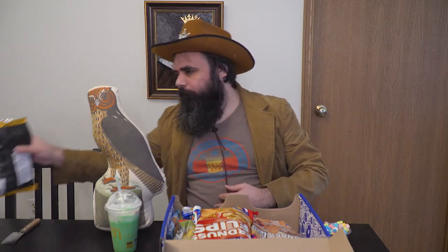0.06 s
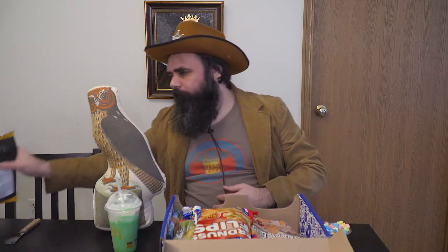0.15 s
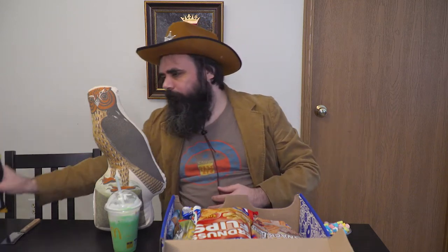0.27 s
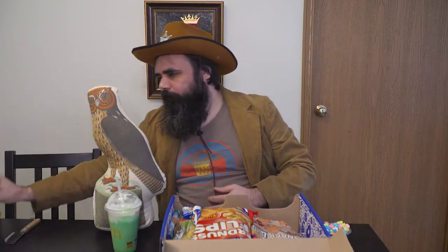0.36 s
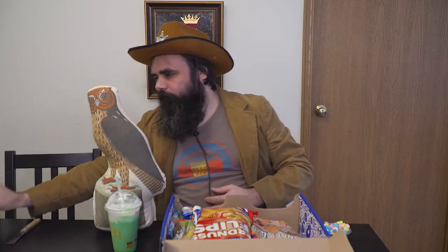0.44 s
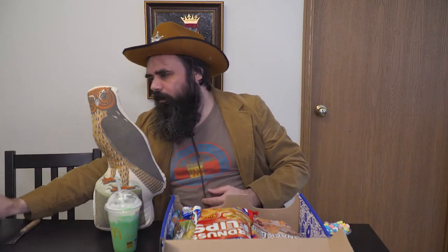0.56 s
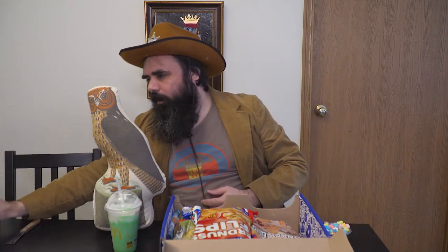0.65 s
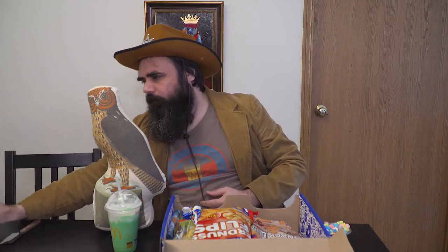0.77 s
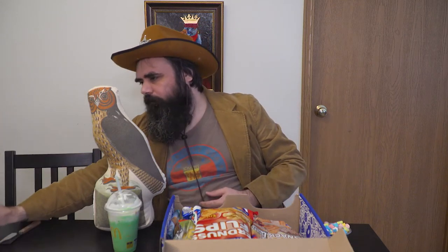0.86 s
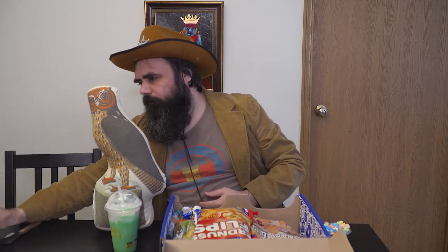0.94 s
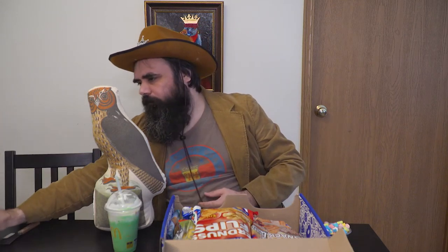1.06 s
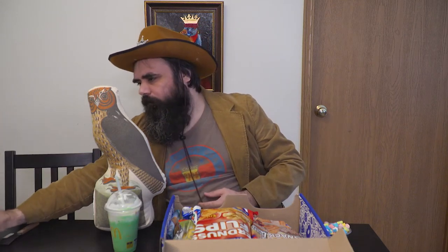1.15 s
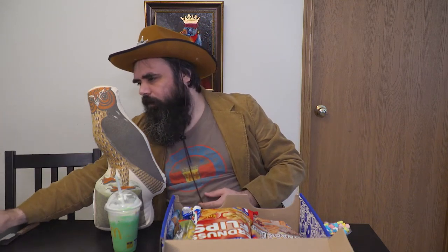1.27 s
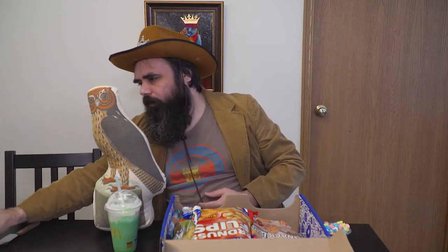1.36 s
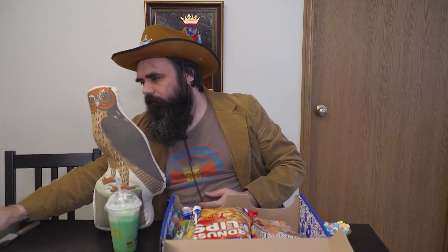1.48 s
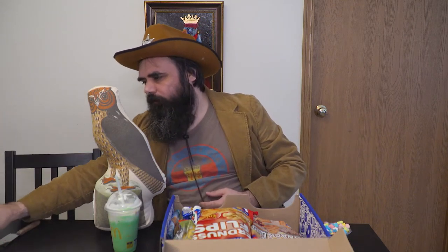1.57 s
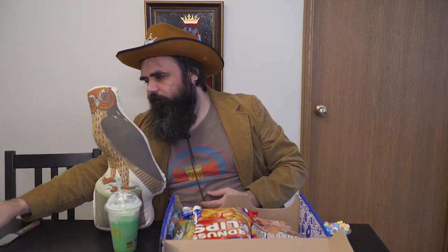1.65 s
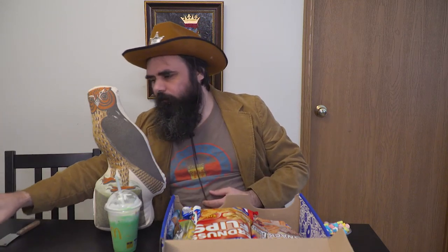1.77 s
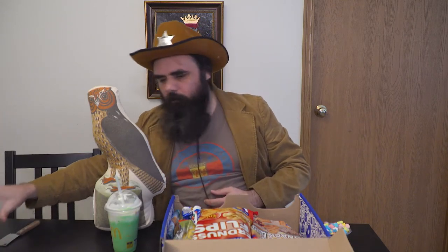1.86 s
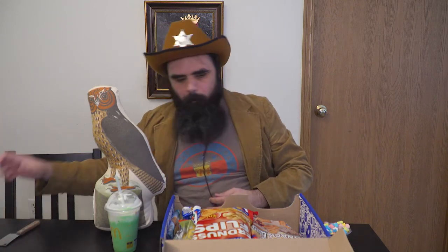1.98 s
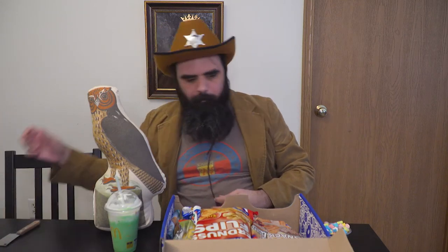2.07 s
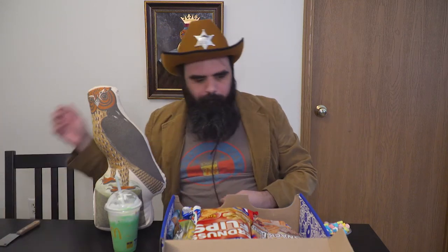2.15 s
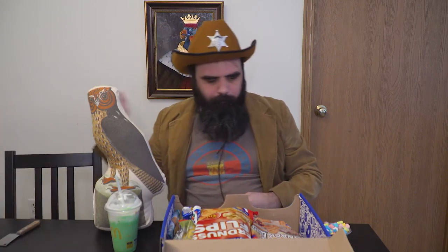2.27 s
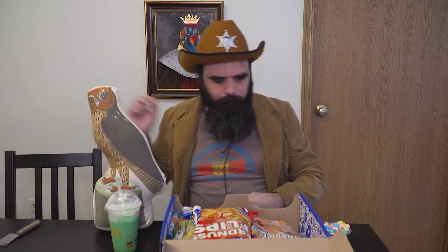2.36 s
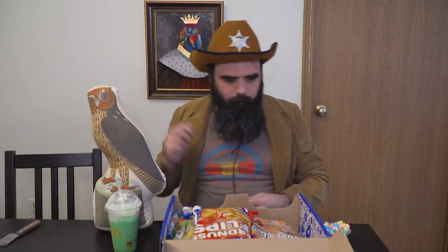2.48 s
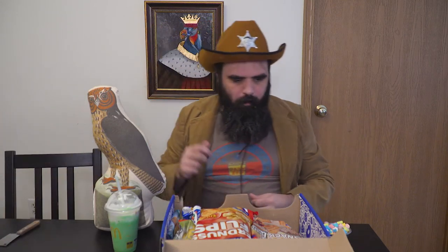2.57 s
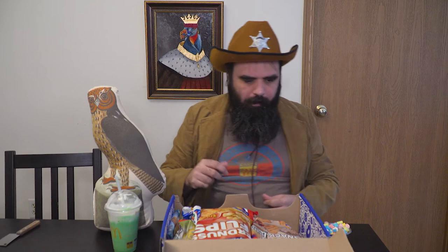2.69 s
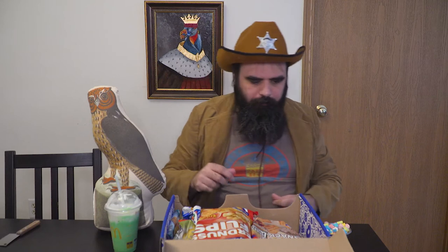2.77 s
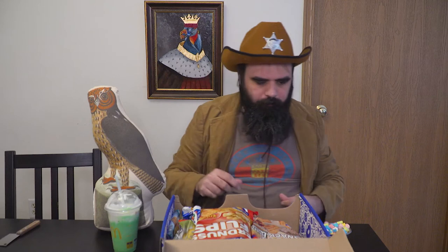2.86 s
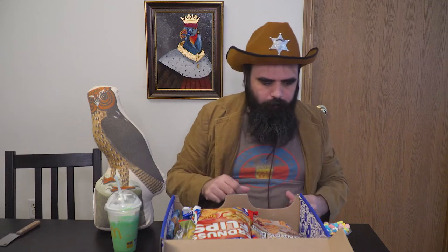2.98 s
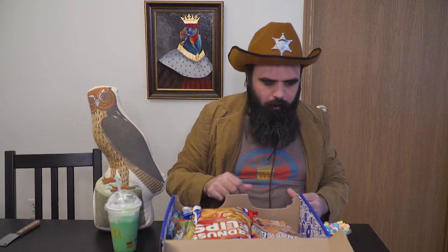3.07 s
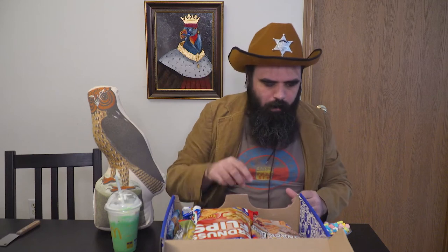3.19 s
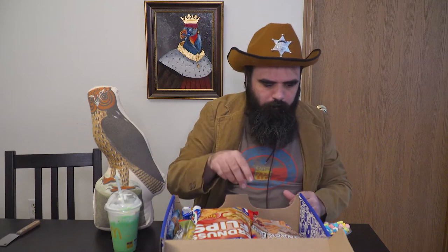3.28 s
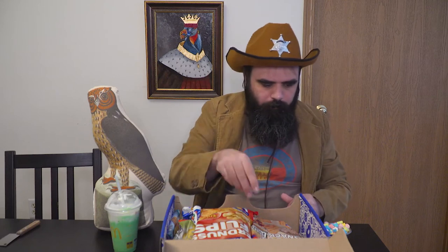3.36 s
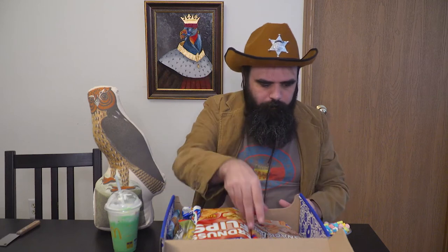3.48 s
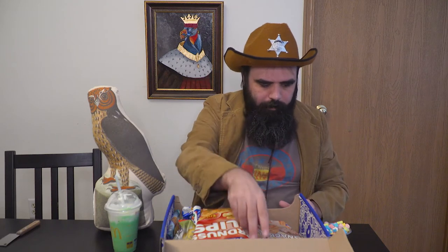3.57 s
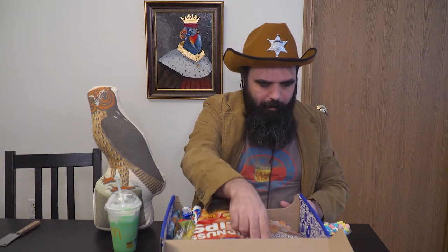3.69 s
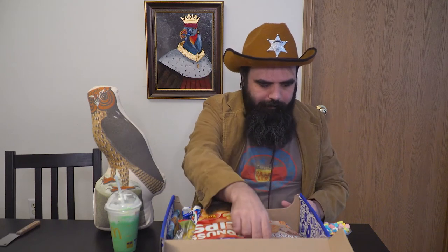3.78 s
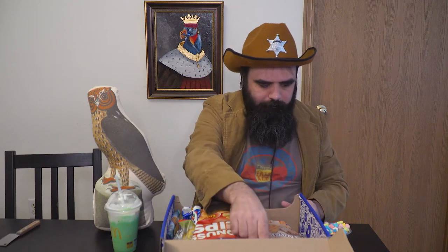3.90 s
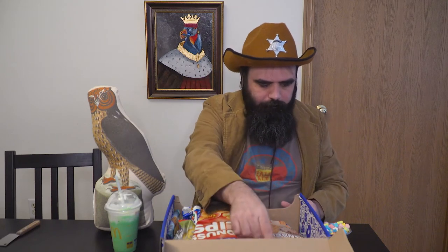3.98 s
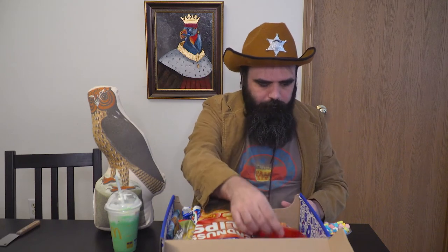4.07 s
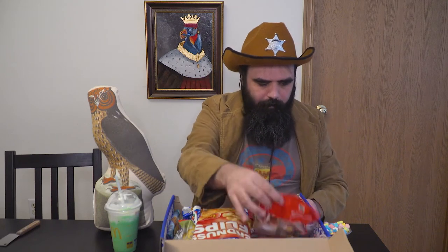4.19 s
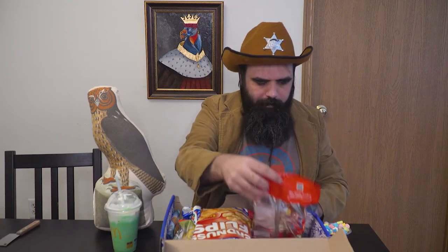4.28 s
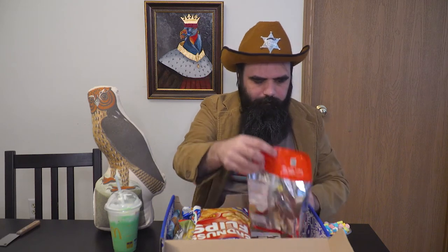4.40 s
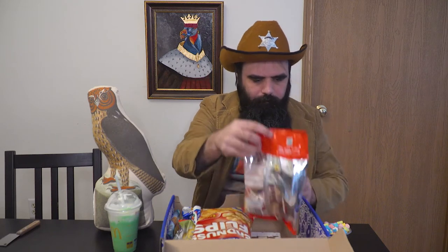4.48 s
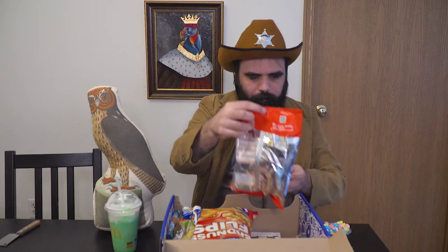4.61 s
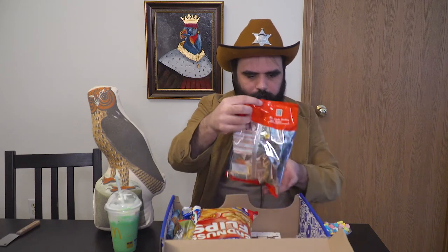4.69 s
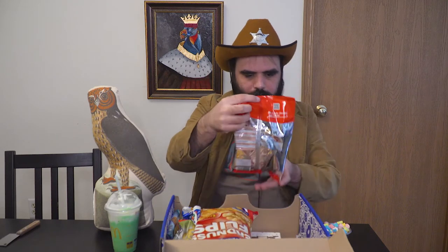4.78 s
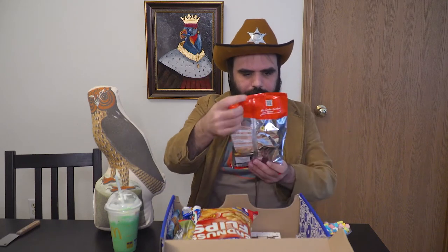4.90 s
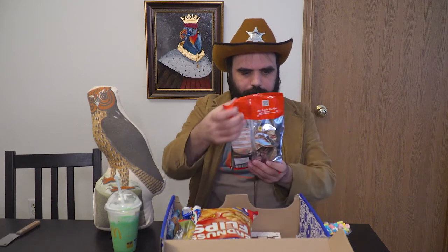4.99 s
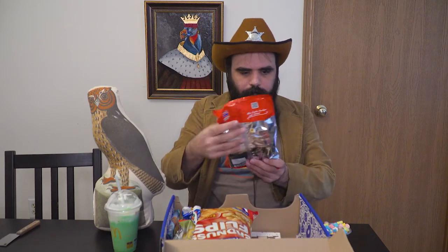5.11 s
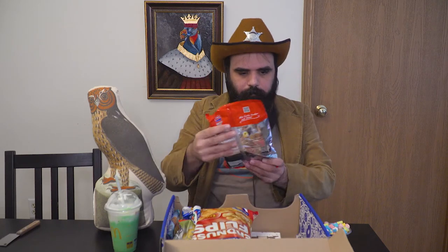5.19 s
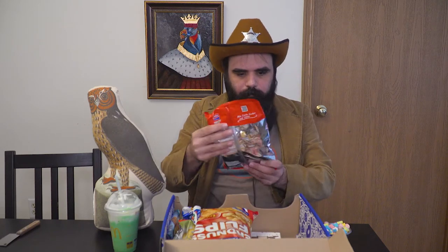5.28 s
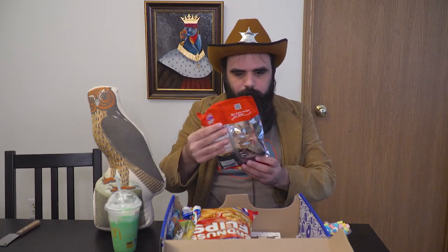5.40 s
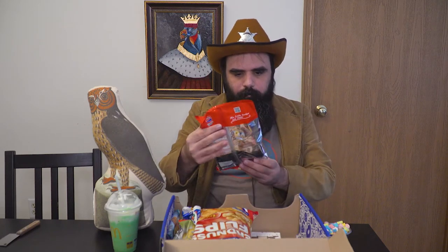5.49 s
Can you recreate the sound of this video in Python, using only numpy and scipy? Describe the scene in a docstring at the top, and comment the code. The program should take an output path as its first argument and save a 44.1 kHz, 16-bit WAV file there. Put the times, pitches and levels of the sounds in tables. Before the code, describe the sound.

Crisp plastic crackling fades to quiet with small clicks and soft bumps, then louder bag rustling against cardboard in a small room.

```python
"""Plastic snack bags at a table

Thin bags are handled in a small room: one is laid aside, another is pulled out of a cardboard box.
Creases snap as short noise bursts over a dense crackle of tiny ringing clicks; the contents rustle low.
Between the bags there are mostly stray ticks, soft bumps and scuffs, made of short tones and noise bands.
The room adds echoes and a short noise tail; a mains hum (a sine) and faint hiss lie below."""
import sys
import numpy as np
from scipy import signal
from scipy.fft import rfft, irfft
from scipy.io import wavfile

SR = 44100
rng = np.random.default_rng(int(sys.argv[2]) if len(sys.argv) > 2 else 0)


def int16_out(signal):
    """Quantize to a 16-bit WAV file."""
    q = np.round(np.clip(np.atleast_2d(signal).T, -1, 1) * 32767)
    wavfile.write(sys.argv[1], SR, q.astype(np.int16))


N = 244652

# Source levels are those before the microphone port; hiss and hum bypass it.

# Steady hiss, its colour: f/Hz, relative level per Hz/dB
HISS_COLOUR = [(41, -47), (70, 0.5), (155, -7.5), (228, -4), (506, -15), (679, -11), (3410, -17.5),
               (7730, -23.5), (9060, -31), (13300, -29.5), (16000, -32)]
HISS_DB = -68
HUM_HZ, HUM_DB = 50.2, -68

# Effort of the hand on the bag: t/s, level/dB
HAND_EFFORT = [(0.0, -40.5), (0.14, -52.5), (0.3, -51), (0.36, -45.5), (0.58, -49), (0.72, -51.5),
               (0.8, -45.5), (0.89, -54.5), (0.985, -58), (1.04, -62), (1.14, -53), (1.29, -45.5),
               (1.42, -55), (1.56, -60), (1.66, -60.5), (1.83, -72.5), (2.2, -71), (2.45, -79), (2.65, -70),
               (2.94, -77), (3.2, -68), (3.6, -74.5), (3.63, -59), (3.81, -45), (3.9, -51), (4.02, -43.5),
               (4.26, -44.5), (4.35, -35), (4.45, -51), (4.58, -55), (4.66, -63.5), (4.83, -54.5),
               (4.85, -40), (4.93, -39.5), (5.0, -39.5), (5.13, -42.5), (5.17, -34.5), (5.27, -37),
               (5.38, -45.5), (5.46, -35.5), (5.55, -45.5)]
FLURRY_T60_S = 0.18   # time for the crackle after a loud snap to fall by 60 dB

# How the bag in hand sounds: t/s, crackle tilt/dB per octave, contents level against the handling/dB
BAG_CHARACTER = [(0, -3.5, -4), (.45, -1, -3), (1.0, -3.5, -4.5), (1.6, -3, 1.5), (1.9, -2.5, -9),
                 (2.3, -1.5, 11), (2.5, 1, -15), (2.85, -2.5, 11.5), (3.5, 0.5, -2.5), (3.7, -5, -0.5),
                 (4.05, -1.5, -2), (4.3, 1, -10), (4.7, 0, -6.5), (5.1, -2, -10), (5.55, -1.5, -10.5)]
BRIGHT_PER_DB = 0.06   # the crackle brightens as it swells: dB per octave for each dB of handling

# Colour of the crackling film: f/Hz, relative level per Hz/dB
FILM_COLOUR = [(240, -29), (400, -26), (481, -23.5), (935, 9.5), (5520, -2.5), (7630, -5.5), (8900, -25),
               (12100, -19), (16000, 11.5)]
CREASES_PER_S, CREASE_SPREAD_DB = 1300.0, 4.6   # tiny creases: rate before clumping, spread of sizes
CRACKLE_SHARE, RUSTLE_SHARE = 0.46, 0.52   # amplitude factors on the handling level

# Resonances of the cardboard box: f/Hz, width/Hz, relative level/dB
BOX_RESONANCES = [(252, 36, -8), (384, 48, 2), (603, 21, 0), (1014, 220, -3.5)]
# Bag against the box: t/s, box level against the soft rustle/dB
BOX_CONTACT_LEVEL = [(0, -23), (3.5, -1), (3.62, 5), (4.3, 2.5), (4.6, -3.5), (5.55, 4)]

# Decay of the room tail: f/Hz, time to fall by 60 dB/s
ROOM_DECAY = [(200, 0.46), (530, 0.37), (1400, 0.36), (3700, 0.29), (9700, 0.064)]
ROOM_DB, EARLY_DB, EARLY_T60_S, WALL_CUT_HZ = -11, -10.5, 0.071, 7100
ECHO_SPARSE = 2.6   # noise threshold: about one sample in a hundred carries an early echo

# The loudest creases that snap: t/s, peak level/dB, then three rms levels against that peak/dB:
# body (350-1200 Hz), treble (over 7000 Hz) and the flurry that follows
LOUD_SNAPS = [(0.01, -23.5, -29, -45, -32), (0.034, -22, -30, -21, -31), (0.051, -22, -30, -23, -25),
              (0.079, -18.5, -21.5, -21, -20), (0.163, -14, -22.5, -18.5, -23),
              (0.261, -31, -9.5, -22, -25), (0.313, -36, -17, -14, -20), (0.341, -28, -17, -22, -25),
              (0.352, -25.5, -24, -22, -15), (0.378, -27.5, -27, -15, -31), (0.412, -29, -28, -11, -19),
              (0.432, -29, -33, -6, -24), (0.471, -23.5, -21, -18, -19), (0.49, -28, -13, -19, -20),
              (0.495, -28.5, -10, -28, -22), (0.506, -30.5, -3.5, -23, -23), (0.533, -27.5, -9.5, -10, -19),
              (0.537, -21, -22, -21, -24), (0.568, -22.5, -13.5, -27, -14), (0.574, -32, -12, -21, -22),
              (0.602, -22.5, -27, -21, -19.5), (0.614, -29, -19, -21, -24), (0.657, -35.5, -4, -28, -24),
              (0.668, -20.5, -19.5, -18, -20), (0.741, -23, -23, -9.5, -25), (0.805, -34, -5.5, -19, -27),
              (0.827, -31, -17, -20, -16), (0.895, -21, -18.5, -17.5, -19.5), (0.963, -23.5, -18, -17, -15),
              (0.982, -25, -18, -19, -13.5), (1.049, -27, -17.5, -11, -18), (1.068, -20.5, -27, -13, -23.5),
              (1.072, -25.5, -14, -34, -26), (1.121, -27.5, -31, -11, -33), (1.13, -31, -26, -19, -27),
              (1.16, -19, -21, -5, -19), (1.185, -28, -15, -29, -19), (1.189, -31, -15, -20, -24),
              (1.213, -35, -18, -20, -25), (1.225, -25, -18.5, -7.5, -22), (1.233, -28.5, -31, -14, -22),
              (1.241, -29, -17, -12, -25), (1.257, -30, -25, -12, -22), (1.278, -20, -21, -20, -23),
              (1.285, -26, -19, -28, -29), (1.339, -37, -7, -19, -20), (1.357, -22, -18.5, -11, -17.5),
              (1.43, -38, -12, -19, -13), (1.459, -37.5, -8.5, -25, -22), (1.54, -39.5, -9, -16, -15),
              (1.582, -32, -16, -20, -16), (1.591, -32, -21, -34, -13.5), (1.672, -20.5, -14.5, -19, -21),
              (3.608, -44, -15, -18, -22), (3.617, -28.5, -19, -7, -22.5), (3.624, -25.5, -32, -18.5, -35),
              (3.656, -29, -23, -1, -21), (3.665, -20.5, -23, -16, -32), (3.678, -29.5, -19, 0.5, -21),
              (3.731, -18, -17.5, -11, -32), (3.772, -18.5, -19.5, -11.5, -32), (3.794, -30, -10, -28, -24),
              (3.804, -19, -25, -17, -19), (3.813, -28, -12, -11, -16), (3.853, -23, -14, -18, -18),
              (3.871, -22.5, -12.5, -25, -21.5), (3.905, -17, -25, -21, -40), (3.91, -16.5, -16, -13, -21),
              (3.921, -19, -18, -24, -16), (3.969, -34.5, -11, -11, -16), (4.006, -25, -10, -13, -23),
              (4.025, -12, -17.5, -9.5, -23), (4.03, -20, -14, -20, -22), (4.038, -22, -12, -22, -20),
              (4.065, -20.5, -21, -19, -23), (4.121, -28, -11.5, -15, -12.5), (4.172, -16, -27, -5, -20.5),
              (4.181, -22, -20, -18, -22), (4.186, -21, -26, -12, -22), (4.222, -22.5, -26, -16, -18.5),
              (4.258, -30, -25, -19, -21), (4.28, -26.5, -19, -28, -31), (4.303, -17, -26, -21, -35),
              (4.313, -25, -25.5, -26, -11), (4.333, -16.5, -26, -33, -21.5), (4.351, -22.5, -13, -11, -24),
              (4.361, -11.5, -37.5, -29, -30), (4.386, -20.5, -26, -12, -16), (4.435, -22, -24, -12, -24),
              (4.47, -15.5, -22.5, -14, -20.5), (4.482, -37, -16, 5, -22),
              (4.494, -14.5, -26.5, -2.5, -17.5), (4.552, -16, -21.5, -17.5, -20.5),
              (4.567, -22.5, -24.5, -9, -15.5), (4.587, -19.5, -30, -23, -28), (4.676, -39, -26, -18, -18),
              (4.688, -28.5, -23.5, -20, -18), (4.721, -29, -22.5, -8, -19), (4.752, -25, -25, -35.5, -21),
              (4.837, -28, -24, -4, -25), (4.847, -25.5, -24, -4, -20), (4.861, -16.5, -15, -26, -25),
              (4.909, -18, -23.5, -22, -16), (4.917, -15, -19.5, -5, -13), (4.929, -19, -18.5, -22, -16),
              (4.989, -23, -20, -10, -22), (5.013, -26, -20, -7, -20), (5.052, -28, -15, -31, -17),
              (5.113, -26.5, -24, -29, -25), (5.131, -28, -18, -7, -16), (5.145, -21, -22, -4.5, -15),
              (5.155, -23, -21, -30, -18), (5.165, -20, -18, -24, -15), (5.183, -20, -9, -2, -22),
              (5.193, -12, -18, -8, -24), (5.196, -14.5, -26, -20, -24), (5.201, -19, -22, -18, -24),
              (5.205, -12.5, -22, -7, -19), (5.21, -25, -21, -17, -25), (5.221, -16.5, -19, -18, -22),
              (5.231, -17.5, -29, -24, -20), (5.248, -17.5, -10.5, -6.5, -17), (5.258, -15, -21, -7, -24),
              (5.264, -12.5, -28, -33, -21), (5.269, -22, -12, -19, -29), (5.277, -24, -15, -15, -31),
              (5.29, -31, -30, -20, -26), (5.308, -30, -29, -11, -31), (5.328, -24.5, -42, -25, -31),
              (5.359, -31, -22, -13, -20), (5.41, -22.5, -31, -20.5, -16), (5.442, -20, -15, -19, -35),
              (5.454, -24.5, -10, -16, -20), (5.46, -27, -15, -15, -20), (5.476, -26, -15, -10, -28),
              (5.494, -30, -21, -17, -20), (5.511, -27, -15.5, -10, -20), (5.524, -20, -21, -20, -17)]
# Edges of the four snap bands: f/Hz
SNAP_BAND_EDGES = [350, 1200, 3000, 7000, 15500]
# How long the film shivers in each band: time to fall by 60 dB/s
SNAP_DECAY = [0.021, 0.014, 0.0039, 0.00078]
SETTLE_DB, SETTLE_T60_S = -9.958, 0.034   # small creases after a snap, before scaling to its peak
CREST_DB = 8.5   # peak over rms in the lowest and highest band
MIDDLE_DB, LEAN = -4.5, 0.33   # two middle bands: level against the peak, tilt by body minus treble
SMALL_PER_S, SMALL_SCATTER_DB = 45.0, 4.5   # lesser snaps: rate before thinning, chance spread
# Lesser snaps, one value for each band: peak level over the handling/dB
SMALL_SNAP_LEVELS = [2.6, 9.3, 11.4, 5.2]
BUSY_DB = -62   # below this handling level the lesser snaps grow rare
SNAP_DELAY_S = .001   # short delay before each snap and tick

# Soft bumps: t/s, level/dB, f/Hz
SOFT_BUMPS = [(0.02, -41, 1194), (0.083, -35.5, 270), (0.161, -39, 990), (0.3, -36, 347),
              (0.337, -42, 1100), (0.466, -32.5, 418), (0.508, -42, 437), (0.793, -37.5, 252),
              (2.012, -51.5, 340), (2.086, -52, 390), (2.136, -43, 236), (2.214, -46, 236),
              (2.249, -50.5, 680), (3.38, -65, 900), (3.92, -30, 400), (4.033, -29.5, 435),
              (5.442, -23.5, 936)]

# Bag dragged over an edge: t/s, level/dB, f/Hz
EDGE_SLIDE = [(0.245, -48, 1399), (0.265, -50, 897), (0.295, -47.5, 371), (0.335, -57, 308),
              (0.37, -68, 298)]
SLIDE_ROUGH_HZ = 130   # speed of the random roughness

# Ticks and knocks of furniture, box and resting bag: t/s, knock peak level/dB, f/Hz,
# bright crack peak and tail rms levels against the knock/dB
PITCHED_TICKS = [(1.832, -53, 4600, -20, -30), (1.851, -54, 3400, -2, -32), (1.889, -37, 3570, -2.5, -16),
                 (1.891, -43, 780, -32, -6), (1.894, -36.5, 2180, -10, -18), (1.899, -41, 3500, -8, -20),
                 (1.904, -43, 3600, -14, -20), (1.955, -51, 2500, -10, -18), (2.195, -66, 5500, -10, -30),
                 (2.289, -39.5, 2340, 1, -16), (2.294, -46, 3000, -10, -20), (2.298, -40, 2200, 0, -20),
                 (2.57, -48, 5230, -12, -25), (2.58, -62, 4000, -7, -22), (2.595, -56, 3000, -4, -14),
                 (2.553, -61, 4200, -20, -27), (2.603, -36, 1830, -9, -18), (2.718, -53, 5600, -20, -27),
                 (2.922, -55, 3400, -20, -23), (2.995, -29.5, 1960, -14.5, -17.5),
                 (2.995, -35.5, 890, -30, -14), (3.004, -35, 1900, -12, -16), (3.086, -62, 9500, -8, -30),
                 (3.117, -49, 7500, -5, -30), (3.126, -50, 5700, -3, -31), (3.132, -38, 2270, -7, -21),
                 (3.175, -42, 2620, 1, -11), (3.18, -42.5, 2300, 3, -15), (3.185, -44, 5800, -3, -16),
                 (3.921, -14, 1300, -4, -24), (3.926, -17, 1800, -10, -20), (3.932, -21, 2100, -12, -20)]
TICK_SPAN = 1.35   # pitch band as a ratio up and down
TICK_T60_S, TICK_TAIL_T60_S = 0.0056, .2   # decay of the tick and of its tail
# Weaker repeats of each tick: delay/s, level/dB
TICK_REPEATS = [(.0022, -6), (.0047, -12), (.0088, -16)]

# Sleeve and hand brush over something: t/s, swell time/s, level at the top of the swell/dB, f/Hz
HAND_SCUFFS = [(2.014, 0.0066, -59, 595), (2.08, 0.005, -60, 650), (2.135, 0.0081, -63, 1200),
               (2.245, .012, -63, 890), (2.458, 0.0068, -64.5, 800), (2.506, .005, -60.5, 1090),
               (2.525, .012, -67.5, 1300), (2.633, 0.011, -50, 750), (2.822, 0.0091, -62, 637),
               (2.866, 0.01, -62, 650), (2.922, 0.008, -64, 695), (3.36, .03, -66.5, 1210)]
SCUFF_SPAN = 1.8   # band as a ratio up and down

# Microphone port: f/Hz, width/Hz, gain before the overall cut/dB
PORT_RESONANCES = [(1580, 840, 3), (3585, 860, 8), (5560, 780, 7.5), (7590, 545, 10.5), (8850, 750, -7),
                   (9660, 1500, 4.5), (11940, 620, 8)]
CUTOFF_HZ = 16700


def amp(db):
    """Turn decibels into an amplitude factor."""
    return 10 ** (np.asarray(db) / 20)


def rms_one(x):
    """Scale a sound to an rms level of 1."""
    return x / np.sqrt(np.mean(x ** 2) + 1e-20)


def in_time(rows):
    """Draw straight lines between table rows, giving each column one value a sample."""
    s, *columns = np.transpose(rows)
    return [np.interp(np.arange(N) / SR, s, c) for c in columns]


def at_hz(points, hz):
    """Read a table at any frequency, on a logarithmic frequency scale."""
    table = np.array(points)
    return np.interp(np.log(hz), np.log(table[:, 0]), table[:, 1])


def band(x, low, high):
    """Keep the sound between two frequencies."""
    return signal.sosfilt(signal.butter(2, [low, high], "band", fs=SR, output="sos"), x + 1e-18)


def resonance(x, hz, width):
    """Ring at one frequency, with gain 1 at the top."""
    r = np.exp(-np.pi * width / SR)
    top = np.array([1, 0, -1]) * (1 - r * r) / 2
    bottom = [1, -2 * r * np.cos(2 * np.pi * hz / SR), r * r]
    return signal.lfilter(top, bottom, x + 1e-18)


def drift(rate):
    """Wander slowly by chance, with rms 1; made at a tenth of the sample rate."""
    r = np.exp(-20 * np.pi * rate / SR)
    white = rng.standard_normal(N // 10 + 2002)
    slow = signal.lfilter([1], [1, -2 * r, r * r], white)[2000:]
    return np.interp(np.arange(N) / 10, np.arange(len(slow)), rms_one(slow))


def place(times, sounds):
    """Start each row of sounds at its time."""
    out = np.zeros(N + SR)
    for start, sound in zip(np.round(times * SR).astype(int), sounds):
        out[start:start + len(sound)] += sound
    return out[:N]


def grains(per_s, spread_db):
    """Random clicks, many small and few large, coming in clumps."""
    born = rng.random(N) < per_s * amp(4 * drift(30)) / SR
    size = np.minimum(rng.exponential(1, N), 3)
    return born * amp(spread_db * size) * rng.choice([-1, 1], N)


def background():
    """Steady coloured hiss, and a mains hum whose level wavers slightly."""
    hz = np.maximum(np.arange(N // 2 + 1) * SR / N, 1)
    spectrum = rfft(rng.standard_normal(N)) * amp(at_hz(HISS_COLOUR, hz))
    hiss = rms_one(irfft(spectrum, N))
    sine = np.sqrt(2) * np.sin(2 * np.pi * HUM_HZ * np.arange(N) / SR)
    hum = sine * amp(0.17 * drift(3.3))
    return amp(HISS_DB) * hiss + amp(HUM_DB) * hum


def handling():
    """Handling level in dB: power of the hand's effort plus a dying flurry after each loud snap."""
    rows, t = np.array(LOUD_SNAPS), np.arange(SR // 4) / SR
    flurry_db = rows[:, 1:2] + rows[:, 4:] - 60 * t / FLURRY_T60_S
    flurry = place(rows[:, 0], amp(flurry_db) ** 2)
    return 10 * np.log10(amp(in_time(HAND_EFFORT)[0]) ** 2 + flurry)


def crackle(level_db, bright_db):
    """Tiny creases of all sizes, each ringing a cycle or two around its own pitch."""
    clicks, pitches = grains(CREASES_PER_S, CREASE_SPREAD_DB), np.geomspace(450, 14500, 22)
    dealt, out = rng.integers(0, 22, N), 0
    for k, hz in enumerate(pitches):
        own = clicks * (np.abs(dealt - k) < 3)    # a crease also excites the neighbouring pitches
        ringing = rms_one(resonance(own, hz, .4 * hz))
        tilt = np.clip(bright_db, -5, 2) * np.log2(hz / 2500)
        # the bands widen with pitch, hence the square root
        out = out + amp(at_hz(FILM_COLOUR, hz)) * amp(tilt) * np.sqrt(hz) * ringing
    untilted_rms = np.sqrt(np.sum(amp(at_hz(FILM_COLOUR, pitches)) ** 2 * pitches))
    return CRACKLE_SHARE * amp(level_db) * out / untilted_rms


def rustle(level_db):
    """The contents and air cushion shift: soft low grains that ring in the box when the bag rubs it."""
    soft = rms_one(band(band(grains(500.0, 5.5), 147, 2600), 118, 890))
    box = rms_one(sum(amp(db) * resonance(soft, hz, width) for hz, width, db in BOX_RESONANCES))
    return RUSTLE_SHARE * amp(level_db) * (soft + amp(in_time(BOX_CONTACT_LEVEL)[0]) * box)


def room(x, count=64):
    """Early echoes from table and near walls, then a tail that dies band by band.

    Echoes and tail are drawn anew for each short stretch of time."""
    t, edges = np.arange(SR // 3) / SR, 100 * 2 ** np.arange(0, 7.6, .5)
    white = rng.standard_normal((3, count, len(t)))
    tail = 0
    for k, (low, high) in enumerate(zip(edges, edges[1:])):
        tail = tail + band(white[k % 2], low, high) * amp(-60 * t / at_hz(ROOM_DECAY, low))
    tail *= 1 - np.exp(-t / 0.0024)
    sparse = white[2] * (np.abs(white[2]) > ECHO_SPARSE)
    early = band(sparse, 200, WALL_CUT_HZ) * amp(-60 * t / EARLY_T60_S) * (1 - np.exp(-t / 0.00051))
    response = (amp(ROOM_DB) * rms_one(tail) + amp(EARLY_DB) * rms_one(early)) / np.sqrt(len(t))
    step = N // count + 1
    pieces = np.pad(x, (0, step * count - N)).reshape(count, step)
    return place(np.arange(count) * step / SR, signal.fftconvolve(pieces, response, axes=1))


def snap_levels():
    """Rows (t/s, four peak levels/dB): loud snaps by table, lesser ones by chance, following the effort."""
    s, peak, body, treble, _ = np.transpose(LOUD_SNAPS)
    lean = LEAN * (body - treble)
    loud = peak + np.array([body + CREST_DB, MIDDLE_DB + lean, MIDDLE_DB - lean, treble + CREST_DB])
    draw = np.minimum(rng.standard_normal((500, 4)), 1.5)
    when = np.cumsum(rng.exponential(1, 500)) / SMALL_PER_S
    effort_db = np.interp(when, *np.transpose(HAND_EFFORT))
    small = effort_db[:, None] + SMALL_SNAP_LEVELS + SMALL_SCATTER_DB * draw
    kept = (when < N / SR) & (rng.random(500) < amp(effort_db - BUSY_DB) ** 2)
    return np.vstack([np.column_stack([s, loud.T]), np.column_stack([when, small])[kept]])


def snaps():
    """A crease flips at once, the film shivers (treble dies first), then smaller creases settle."""
    rows, t = snap_levels(), np.arange(2600) / SR
    noise, chance = rng.standard_normal((len(rows), 2, len(t))).transpose(1, 0, 2)
    settling = noise * (chance > 1.6) * amp(SETTLE_DB - 60 * t / SETTLE_T60_S)
    shiver = .5 * noise
    shiver[:, 0] = 2.2 * np.sign(shiver[:, 0])    # the flip itself: one strong first sample
    out = 0
    for k, t60 in enumerate(SNAP_DECAY):
        burst = shiver * amp(-60 * t / t60) + settling
        burst = band(burst, SNAP_BAND_EDGES[k], SNAP_BAND_EDGES[k + 1])
        burst /= np.abs(burst[:, :150]).max(axis=1, keepdims=True)    # peak 1 near the start
        out = out + burst * amp(rows[:, 1 + k])[:, None]
    return place(rows[:, 0] + SNAP_DELAY_S, band(out, 450, 22000))    # thin film radiates no bass


def bumps():
    """Arm, chair and bag touch something soft: a few dull cycles and a puff of cloth."""
    rows, t = np.array(SOFT_BUMPS), np.arange(3000) / SR
    thud = 1.9 * np.sin(2 * np.pi * rows[:, 2:3] * t) * amp(-60 * t / 0.097)
    puff = band(2.0 * rng.standard_normal((len(rows), len(t))), 150, 1240)
    envelope = amp(-60 * t / 0.043) * (1 - np.exp(-t / 0.0018))
    return place(rows[:, 0], amp(rows[:, 1:2]) * (thud + puff) * envelope)


def slide():
    """The bag rubs and comes to rest: a falling tone made rough by random swings in strength."""
    level_db, hz = in_time(EDGE_SLIDE)
    s = np.arange(N) / SR
    touching = (s > EDGE_SLIDE[0][0]) & (s < EDGE_SLIDE[-1][0])
    tone = np.sqrt(2) * np.sin(2 * np.pi * np.cumsum(hz) / SR)
    return touching * amp(level_db) * drift(SLIDE_ROUGH_HZ) * tone


def ticks():
    """A knock around its own pitch, a bright crack and a tail near that pitch; weaker repeats follow the hit."""
    t, out = np.arange(5000) / SR, []
    noise = rng.standard_normal((len(PITCHED_TICKS), 3, len(t)))
    for (s, db, hz, crack_db, tail_db), (knock, crack, tail) in zip(PITCHED_TICKS, noise):
        decay = amp(-60 * t / TICK_T60_S)
        knock = knock * decay + amp(13 - 60 * t / 0.00021)    # noise and a very short push
        for _ in range(2):    # filtered twice for a clearer pitch
            knock = band(knock, hz / TICK_SPAN, hz * TICK_SPAN)
        crack = band(crack * decay, 2800, 7100)
        hit = knock / np.abs(knock).max() + amp(crack_db) * crack / np.abs(crack).max()
        hit = hit + sum(amp(repeat_db) * np.interp(t - lag, t, hit) for lag, repeat_db in TICK_REPEATS)
        tail = rms_one(band(tail, hz / TICK_SPAN ** 2, min(hz * TICK_SPAN, 16000)))
        tail = tail * amp(tail_db - 60 * t / TICK_TAIL_T60_S) * (1 - np.exp(-t / 0.0018))
        out.append(amp(db) * (hit + tail))
    return place(np.array(PITCHED_TICKS)[:, 0] + SNAP_DELAY_S, np.array(out))


def scuffs():
    """Sleeve and hand brush something: grainy dull noise that swells and fades."""
    t, out = np.arange(8000) / SR, []
    noise = rng.standard_normal((len(HAND_SCUFFS), 2, len(t)))
    for (s, swell, db, hz), (fine, grain) in zip(HAND_SCUFFS, noise):
        brush = rms_one(band(fine * amp(4.5 * grain), hz / SCUFF_SPAN, hz * SCUFF_SPAN))
        envelope = t / swell * np.exp(1 - t / swell)    # reaches 1 at the swell time
        out.append(amp(db) * brush * envelope)
    return place(np.array(HAND_SCUFFS)[:, 0], np.array(out))


def port(x):
    """Standing waves in the microphone opening lift a row of bands and sink one; all is cut by 4 dB."""
    change = sum((amp(db) - 1) * resonance(x, hz, width) for hz, width, db in PORT_RESONANCES)
    return amp(-4.0) * (x + change)


def scene():
    """Bags, bumps and scuffs in the room, with the ticks, over the background."""
    level_db, (tilt_db, contents_db) = handling(), in_time(BAG_CHARACTER)
    bright_db = tilt_db + BRIGHT_PER_DB * (level_db + 50)
    bag = crackle(level_db, bright_db) + rustle(level_db + contents_db) + snaps()
    near = bag + bumps() + slide() + scuffs()
    heard = band(near + room(near) + ticks(), 58, 20500)    # ticks carry their own tail
    return (port(heard) + background())[None]


def record(dry):
    """The last treble droops, then the top is cut steeply."""
    thin = signal.sosfilt(signal.butter(6, 15400, fs=SR, output="sos"), dry)
    return signal.sosfilt(signal.cheby2(14, 40, CUTOFF_HZ, fs=SR, output="sos"), thin)


dry = scene()
out = record(dry)
int16_out(out)
```